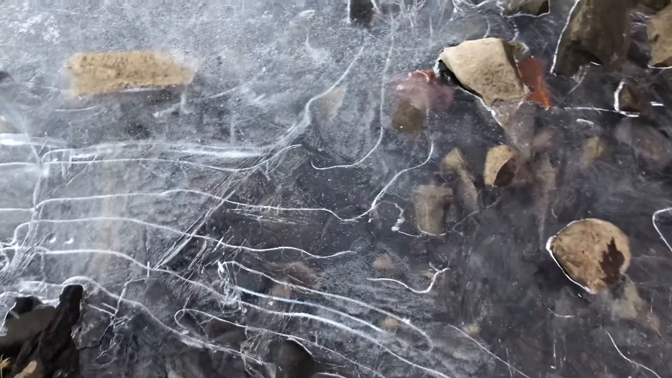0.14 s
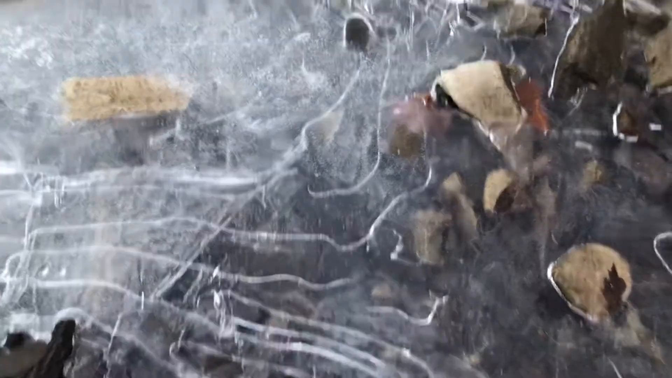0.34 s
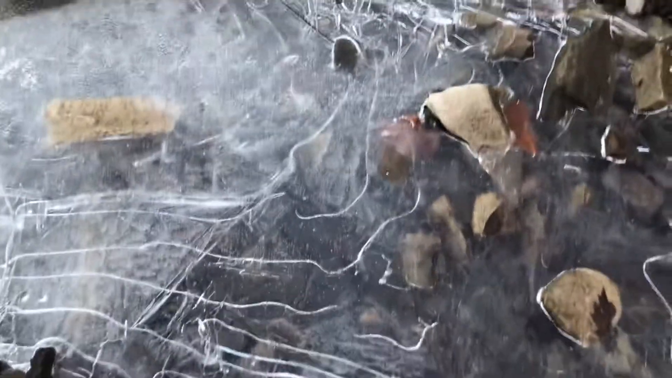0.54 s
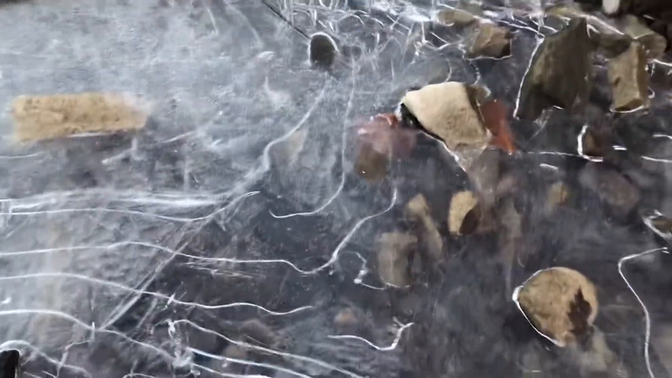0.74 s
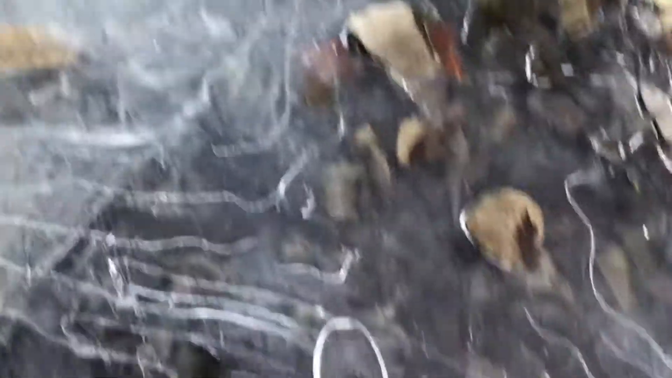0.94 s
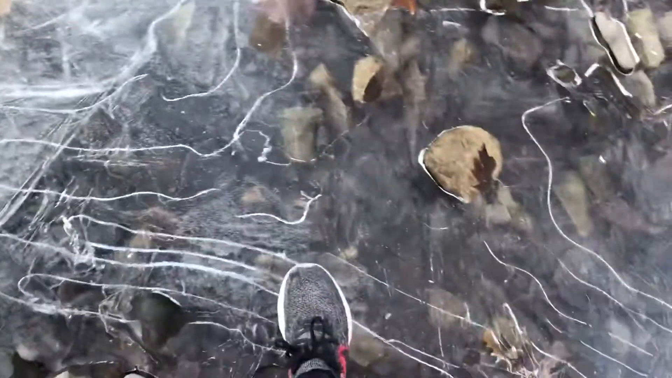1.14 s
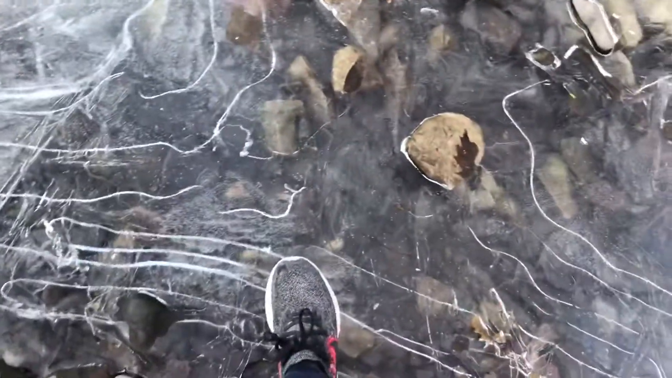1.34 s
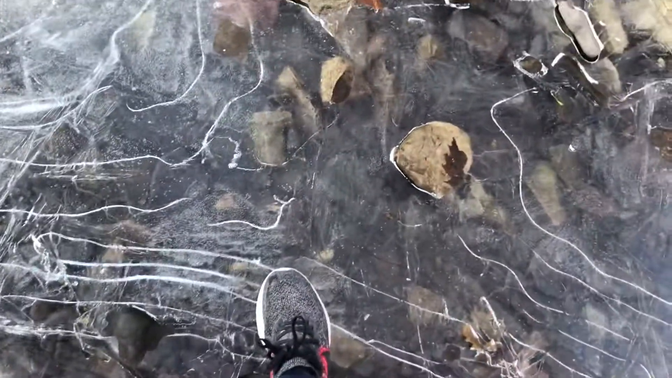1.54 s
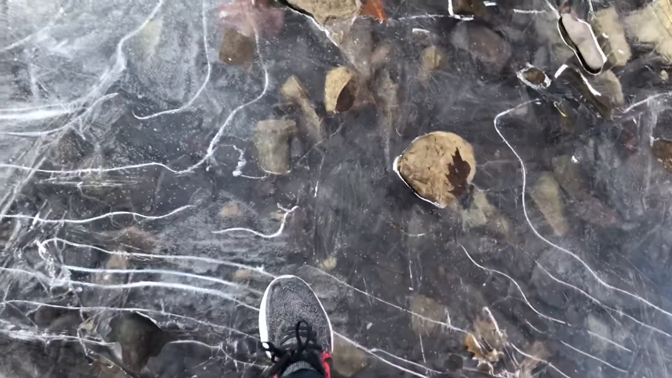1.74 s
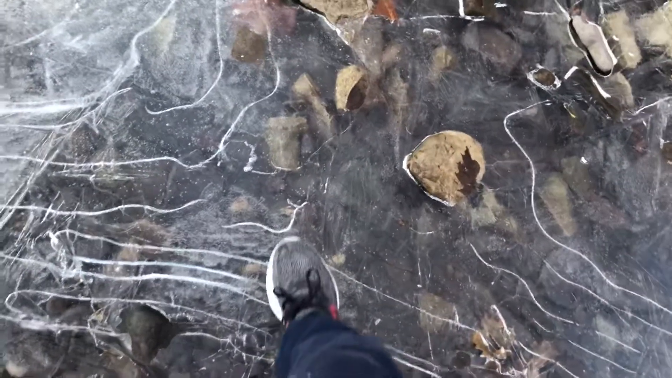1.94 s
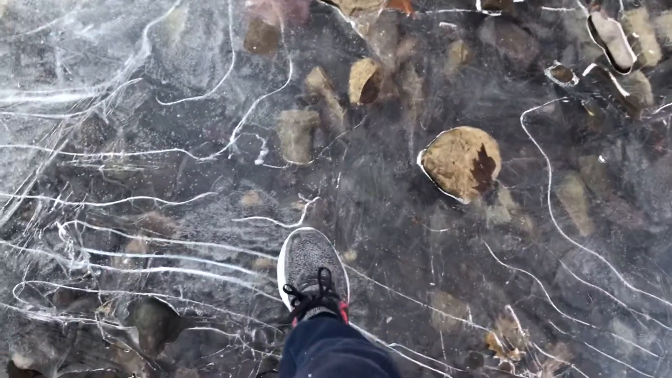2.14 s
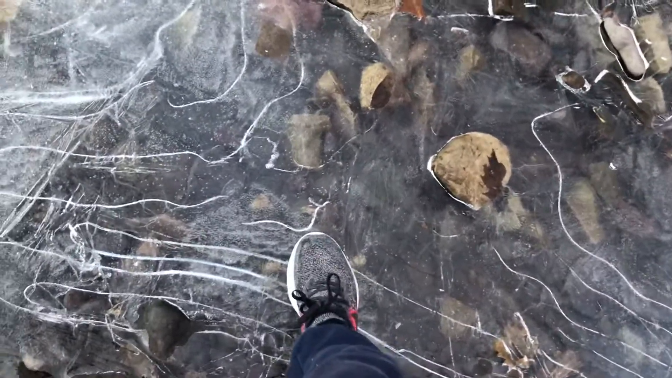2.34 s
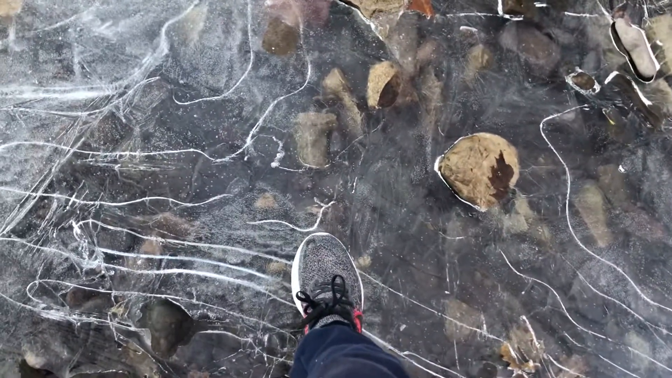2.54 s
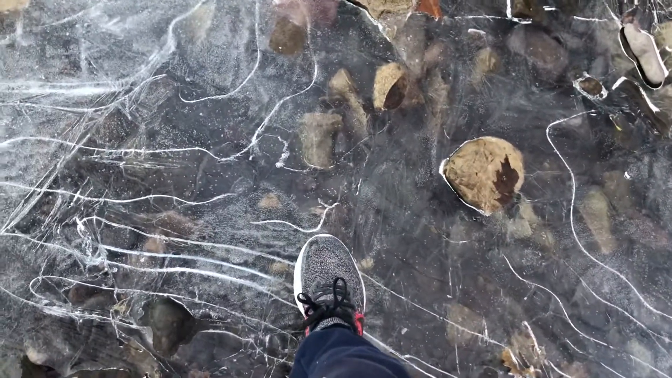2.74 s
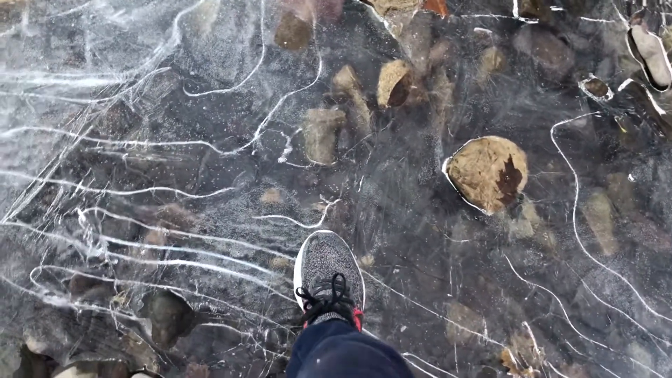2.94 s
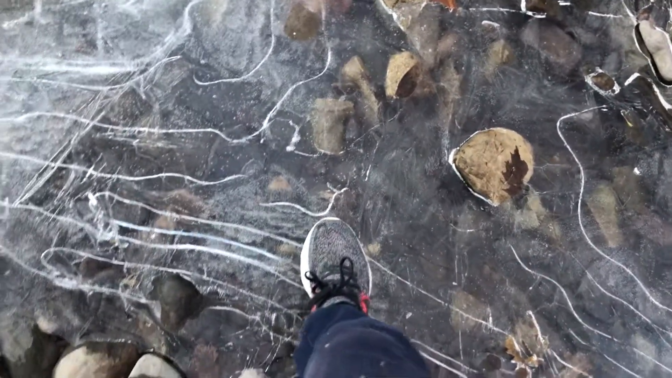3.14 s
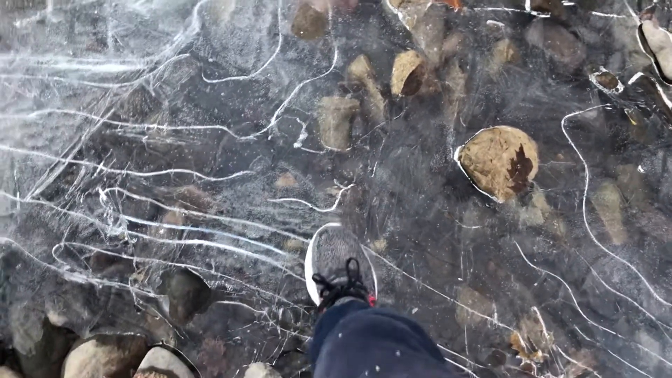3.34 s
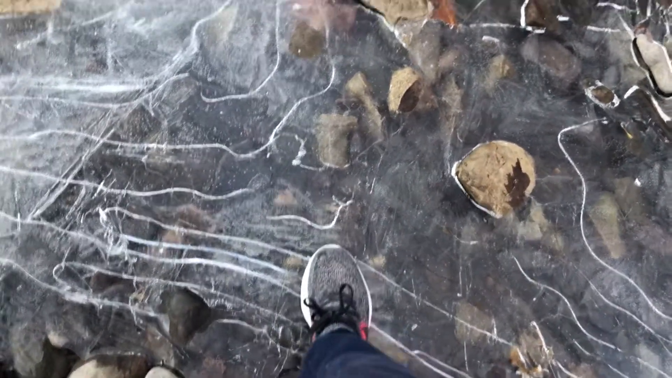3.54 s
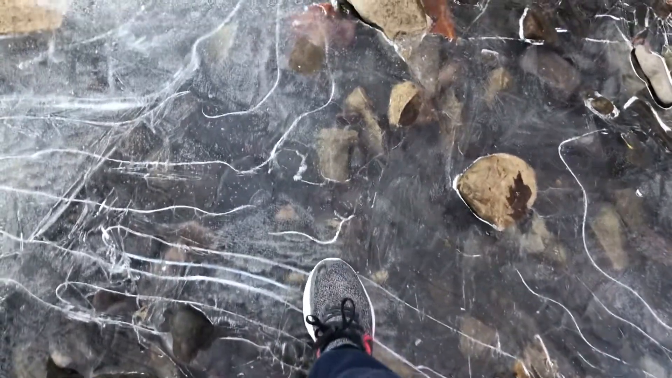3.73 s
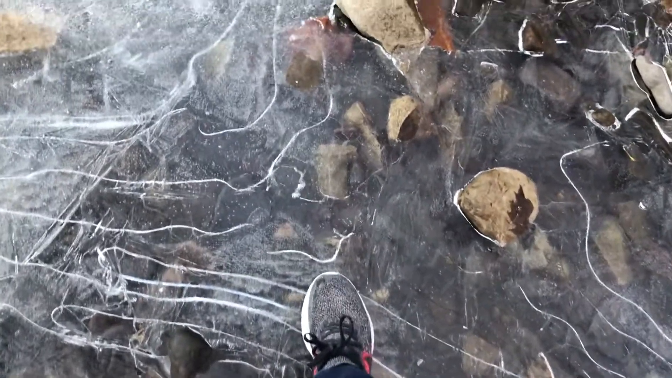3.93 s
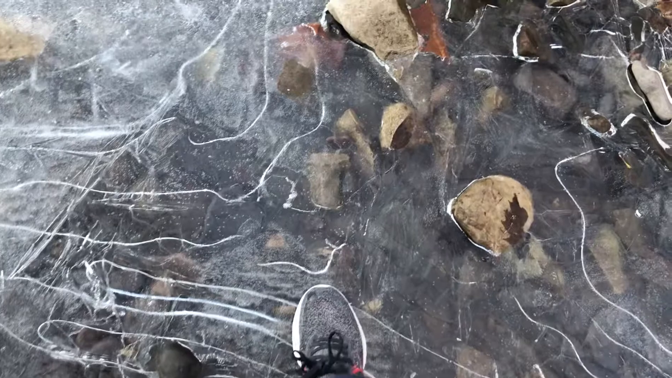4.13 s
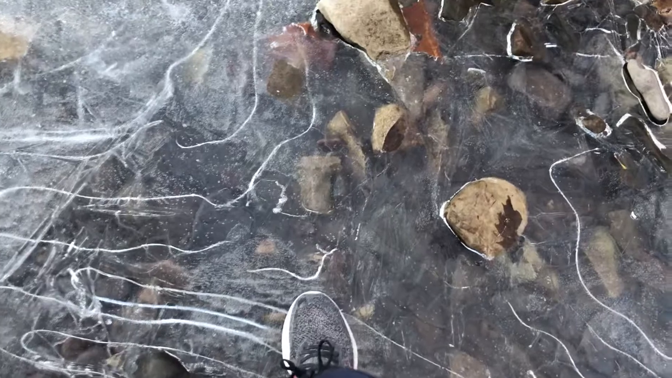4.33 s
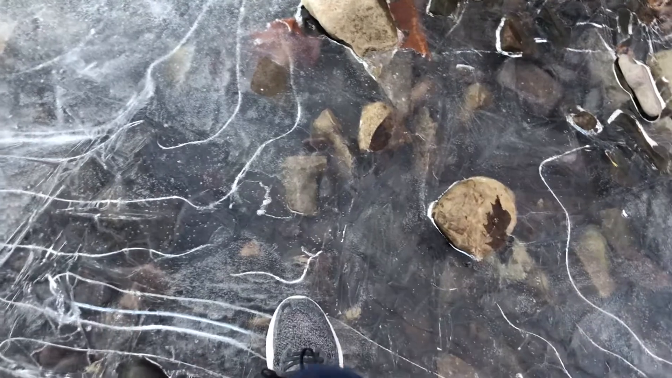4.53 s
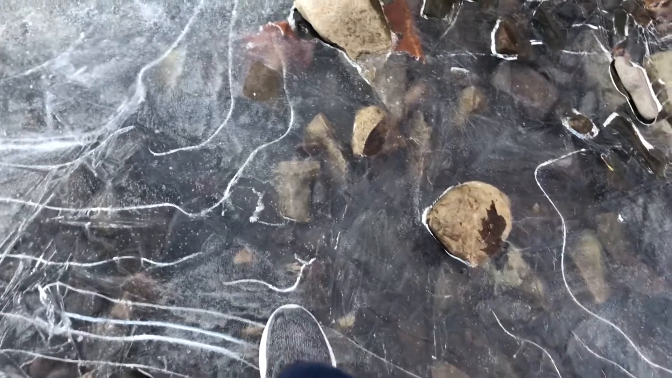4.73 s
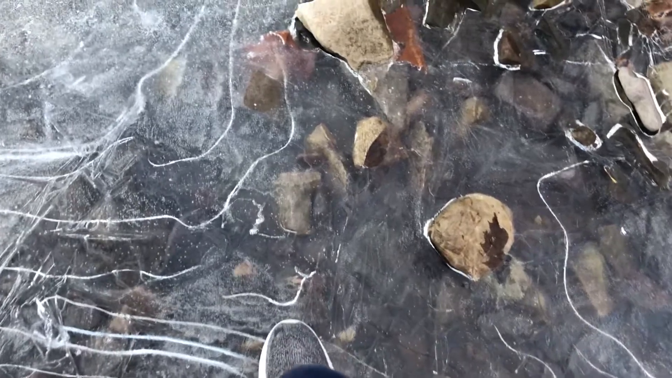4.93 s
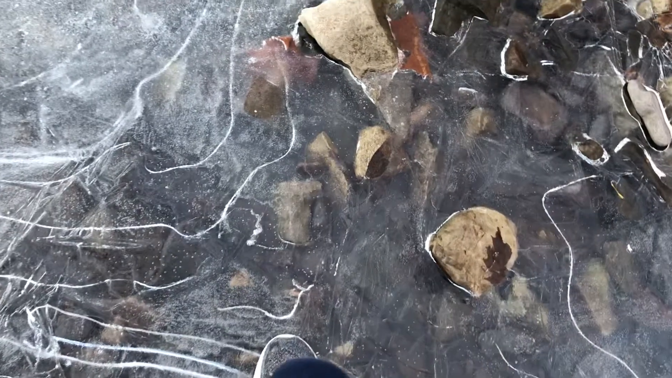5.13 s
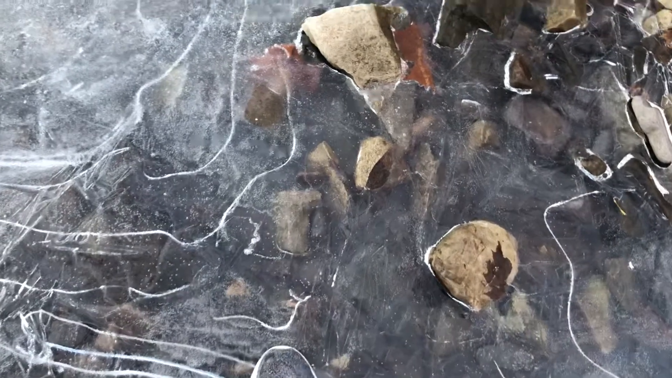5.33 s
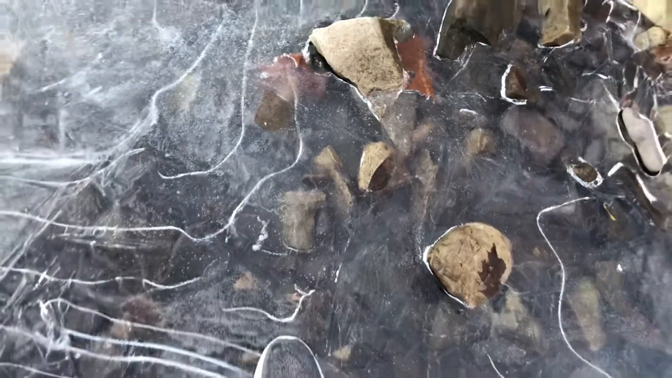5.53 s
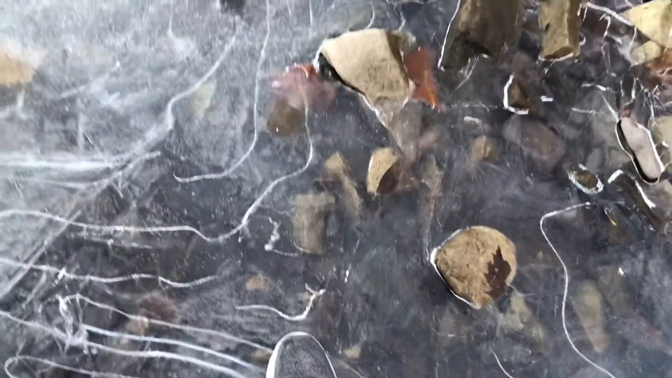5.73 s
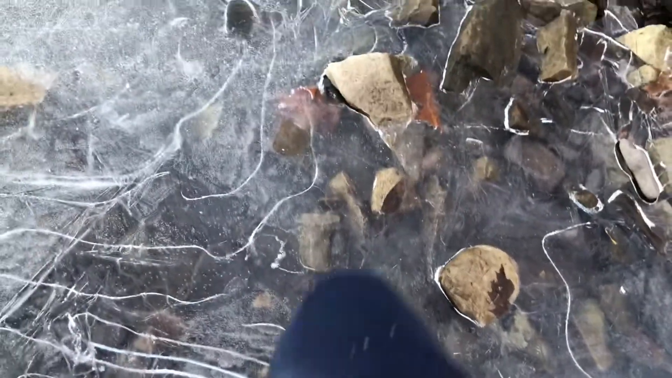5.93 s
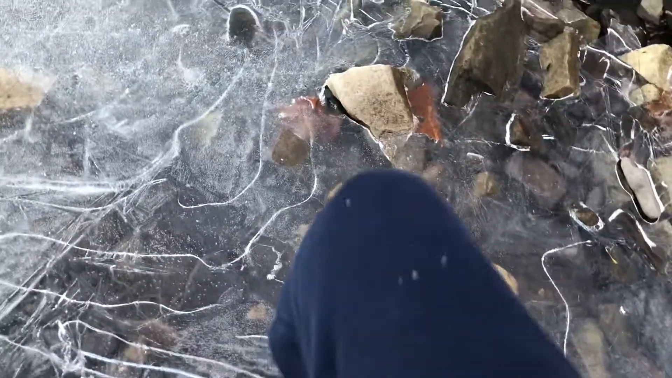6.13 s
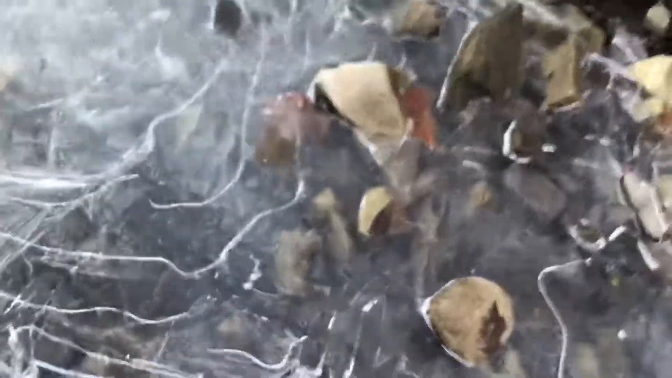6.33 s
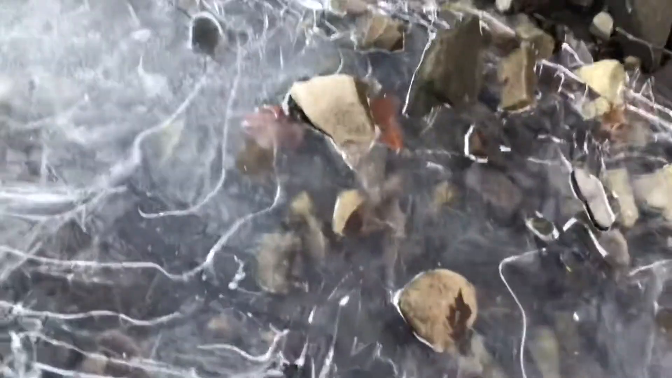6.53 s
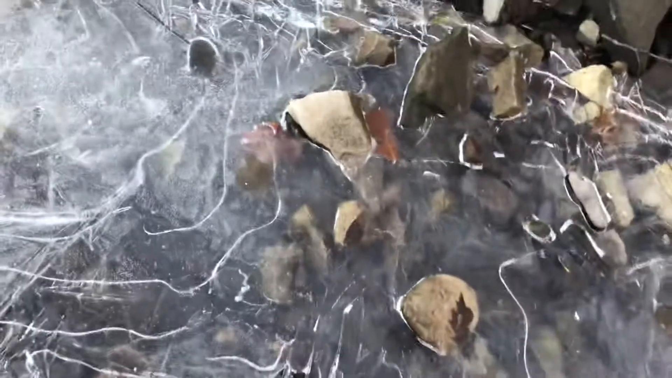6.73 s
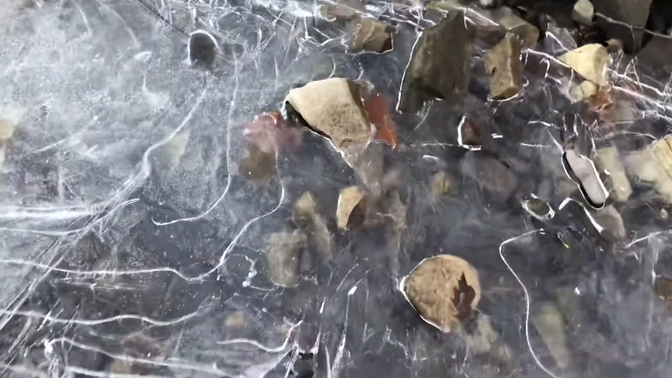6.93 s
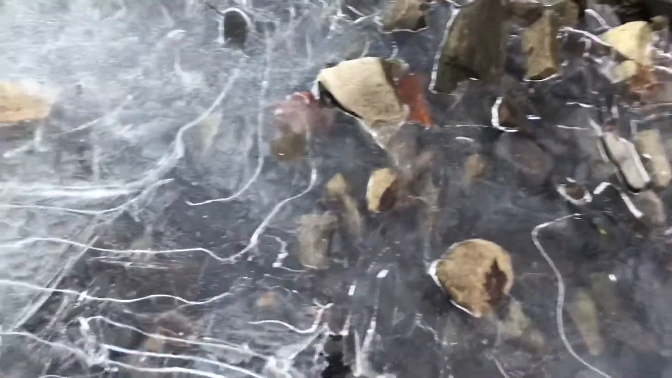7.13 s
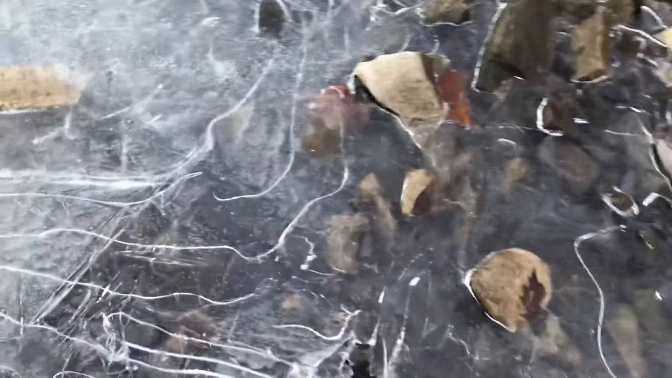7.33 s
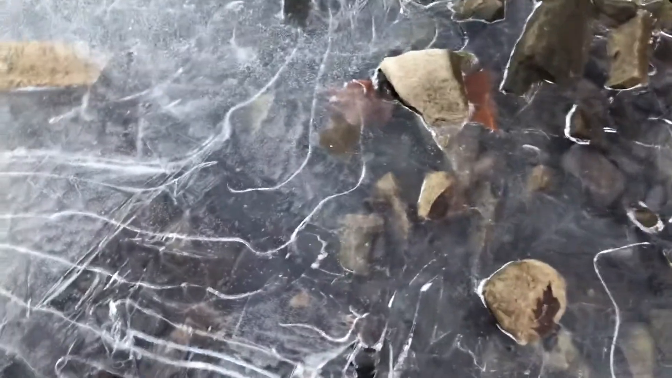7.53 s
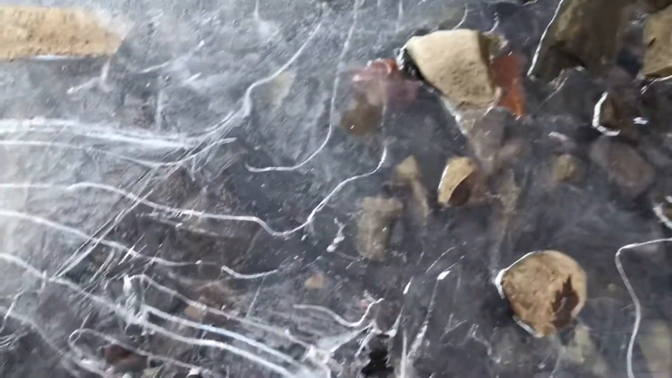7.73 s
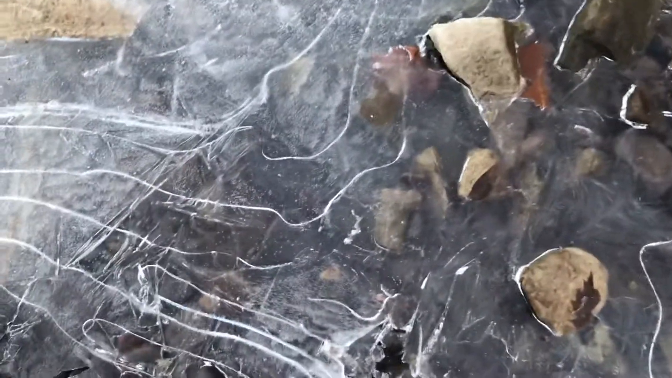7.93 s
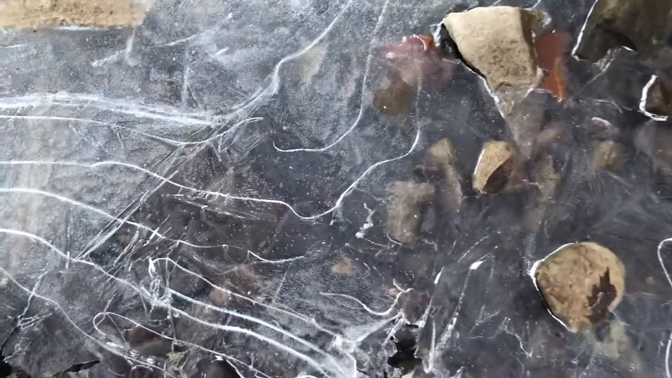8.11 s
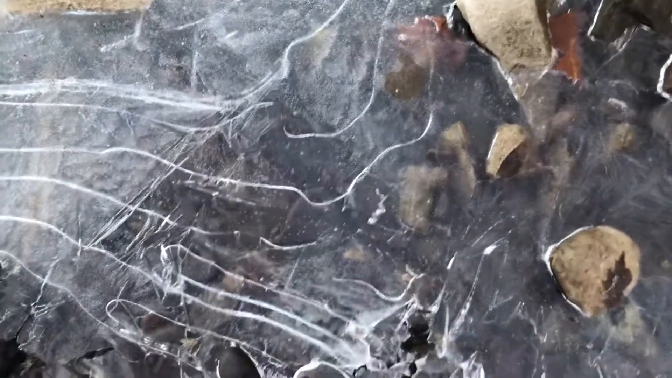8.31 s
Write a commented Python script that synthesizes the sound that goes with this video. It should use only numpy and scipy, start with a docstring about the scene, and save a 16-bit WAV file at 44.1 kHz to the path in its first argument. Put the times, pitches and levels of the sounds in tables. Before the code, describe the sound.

A faint, low creek murmur runs throughout, outdoors and close to the ice, with little echo. Tiny ticks and soft rubbing begin at once. From 0.66 to 0.95 seconds a cluster of sharp cracks and hollow plate knocks crunches, ending in short pings of trapped air. Lighter crackling and grinding follow around 1.45 to 1.75, with sparse snaps after. At 2.9 a firm crack has a slight low thud; then mostly fine ticks until another small crunch at 5.15 to 5.5. At 6.2 the sheet gives way: the loudest moment, a heavy burst of cracks, deep short thump and dense crackling shower, dying quickly into bright clinking splinters and gurgling bubbles until 6.8. A thin splash comes near 6.96. From 7.2 to 7.5 a second brittle, very bright crunch snaps and clinks over bubbling water, then small scattered cracks and ticks continue to the end at about 8.4.

```python
"""A shallow creek murmurs steadily while fine ticking and crunching start up: a shoe pressing on thin ice at its edge.
Each crack is a burst of noise sent through the sheet as a bending wave, treble first; showers of tiny breaks
make the crunch between cracks. Snapping shards, loose plates and trapped air ring as damped tones.
At 6.2 s the sheet gives way with a thump and a dense shower of breaks; then splinters clink and
bubbles gurgle in the hole. The banks scatter a weak echo of the ice."""
import sys
import numpy as np
from scipy import signal
from scipy.fft import rfft, irfft
from scipy.io import wavfile

SR = 44100
rng = np.random.default_rng(int(sys.argv[2]) if len(sys.argv) > 2 else 0)


def inscribe(sig):
    """Save sig as 16-bit PCM at rate SR to the path in sys.argv[1].

    A 1-D sig is mono; a 2-D sig holds one channel per row.
    Samples are clipped to [-1, 1] before scaling.
    """
    pcm = np.round(np.clip(np.atleast_2d(sig).T, -1, 1) * 32767)
    wavfile.write(sys.argv[1], SR, pcm.astype(np.int16))


N = 373438
TIME = np.arange(N) / SR
BREAK_S = 6.2128  # the sheet gives way


def undb(db):
    """Decibels to gain."""
    return 10 ** (np.asarray(db) / 20)


def unit(x):
    """Scale to rms 1."""
    return x / np.sqrt(np.mean(x ** 2))


def add(out, s, x):
    """Mix x into out from time s."""
    i = max(int(s * SR), 0)
    out[i:i + len(x)] += x[:max(N - i, 0)]


def outline_gain(f, points):
    """Gain at each frequency f, drawn between (Hz, dB) points on a log frequency axis."""
    hz, db = np.transpose(points)
    return undb(np.interp(np.log(f), np.log(hz), db))


def colour(x, points):
    """Filter by a (Hz, dB) outline."""
    f = np.fft.rfftfreq(len(x), 1 / SR) + 1
    return irfft(rfft(x) * outline_gain(f, points), len(x))


def walk(rate):
    """Random line through normal knots, rate knots per second."""
    knots = rng.standard_normal(2000)
    return np.interp(TIME * rate, np.arange(len(knots)), knots)


def grains(rate, spread, fade_s):
    """Countless tiny bursts of noise, rate per second, of very unequal size; rms 1."""
    chance, size, sign = rng.random(N), rng.exponential(size=N), rng.standard_normal(N)
    energy = (chance < rate / SR) * undb(spread * np.minimum(size, 4)) ** 2
    power = signal.lfilter([1], [1, -np.exp(-2 / (fade_s * SR))], energy)
    return unit(sign * np.sqrt(power + 1e-18))


def ring(hz, db, t60, rise_s, glide):
    """One damped mode with a soft onset; its pitch drifts up by the fraction glide over t60."""
    t = np.arange(int(t60 * SR) + 1) / SR
    envelope = (1 - np.exp(-t / rise_s)) * np.exp(-np.log(1000) * t / t60)
    cycles = hz * t * (1 + glide * t / t60 / 2)
    return undb(db) * envelope * np.sin(2 * np.pi * cycles)


def swarm(table, octaves, range_db, t60, glide):
    """Many short rings scattered evenly in time, pitch and level around each row's values."""
    out = np.zeros(N)
    for start, end, count, hz, db in table:
        for when, pitch, size in rng.random((80, 3))[:int(count)]:
            s = start + when * (end - start)
            one_hz = hz * 2 ** (octaves * (pitch - .5))
            one_db = db + range_db * (size - .5)
            add(out, s, ring(one_hz, one_db, t60, rise_s=0.000071, glide=glide))
    return out


# Colour of the creek's murmur. Each row: frequency in Hz, relative level in dB.
CREEK_COLOUR = [(20, -49.5), (45, 3), (65, 5), (110, 1), (220, -6), (360, -3.5), (500, -10), (1150, -7),
                (2000, -17.5), (3000, -23.5), (4500, -26.5), (8000, -35.5), (16000, -37)]
CREEK_DB = -56  # rms of the murmur


def creek():
    """Steady noise of running water, wavering a little in level, with a faint low drone."""
    murmur = 0
    for rate in (3, 14):
        waver = undb(0.48 * walk(rate))
        murmur = murmur + colour(rng.standard_normal(N), CREEK_COLOUR) * waver
    drone_colour = [(250, -46.5), (335, -25.0), (360, 8.5), (390, -36.5), (480, -46), (2000, -95)]
    drone = colour(rng.standard_normal(N), drone_colour)
    return undb(CREEK_DB) * unit(murmur) + undb(-70.0) * unit(drone)


# The shoe loading the ice. Each row: peak in seconds, swell and fade time constants in seconds,
# dull grinding level in dB, fine crackle level in dB (both before the trims below).
PUSHES = [(.05, 0.18, 0.12, -50, -61), (0.198, 0.032, 0.02, -37.5, -42), (.68, 0.018, .05, -39, -44),
          (.79, 0.029, 0.052, -28, -39), (.96, .015, 0.065, -54, -52), (1.52, 0.035, 0.23, -39.5, -64),
          (1.66, 0.13, 0.16, -45, -46.5), (1.931, 0.03, 0.013, -44, -50), (2.13, 0.026, 0.012, -42, -58),
          (2.94, 0.061, 0.11, -37, -53), (3.25, 0.18, 0.068, -56, -56.5), (4.25, 0.16, 0.27, -64, -67.5),
          (5.191, 0.04, 0.089, -41, -49.5), (5.31, 0.04, 0.062, -44, -48), (5.48, 0.074, 0.067, -46, -54.5),
          (5.789, 0.045, 0.023, -40.5, -46.5), (6.345, .02, 0.023, -39, -54),
          (6.42, 0.029, 0.085, -41.5, -38.5), (6.69, 0.041, 0.06, -45, -51), (6.98, 0.36, 0.15, -58.5, -62),
          (7.27, 0.036, 0.07, -31.5, -35), (7.49, 0.059, 0.047, -51.5, -46.5),
          (7.85, 0.056, 0.18, -48.5, -48), (8., 0.043, 0.028, -46, -51), (8.17, 0.084, .12, -48, -47)]
GRIND_TRIM_DB, CRACKLE_TRIM_DB, TICKING_DB = 0.5, 2.2, -74.5
# Dull low colour of grinding ice. Each row: frequency in Hz, relative level in dB.
GRIND_COLOUR = [(70, -31), (150, -4.5), (300, -8.5), (500, -1.5), (700, -3.5), (1000, -4.5), (1700, -7.5),
                (2800, -15), (6000, -21)]
# Bright colour of fine crackle. Each row: frequency in Hz, relative level in dB.
CRACKLE_COLOUR = [(700, -26), (1800, -9.5), (3800, -0.5), (6000, 0), (8000, -7.5), (11000, -5.5),
                  (16000, -13)]


def crunch():
    """Ice crushed under the sole: each load swells and dies away, dull grinding below, fine crackle above."""
    grind_power, crackle_power = np.zeros(N), np.zeros(N)
    for s, swell_s, fade_s, grind_db, crackle_db in PUSHES:
        distance = np.maximum((s - TIME) / swell_s, (TIME - s) / fade_s)
        load = np.exp(-np.minimum(distance, 20))
        grind_power += (load * undb(grind_db)) ** 2
        crackle_power += (load * undb(crackle_db)) ** 2
    grind = unit(colour(grains(rate=380, spread=4.5, fade_s=.003), GRIND_COLOUR))
    crackle = unit(colour(grains(rate=800, spread=4.7, fade_s=.0008), CRACKLE_COLOUR))
    # the finest ticking of the sheet never quite stops
    ticking = unit(colour(grains(rate=90, spread=4.8, fade_s=.0009), CRACKLE_COLOUR))
    grinding = undb(GRIND_TRIM_DB) * np.sqrt(grind_power) * grind
    crackling = undb(CRACKLE_TRIM_DB) * np.sqrt(crackle_power) * crackle
    return grinding + crackling + undb(TICKING_DB) * ticking


def banks(x, db=-21, t60=0.2):
    """Weak scatter from the stones and banks: a decaying noise echo, duller than the ice, after 7 ms."""
    t = np.arange(SR // 2) / SR
    echo = rng.standard_normal(len(t)) * np.exp(-np.log(1000) * t / t60) * (t > .007)
    echo = colour(echo, [(100, 7.0), (600, 6.5), (3000, 1.5), (15000, -36.5)])
    return undb(db) * signal.fftconvolve(x, echo / np.sqrt(np.sum(echo ** 2)))[:N]


# The four bands of a break: body, knock, snap, fizz. Each entry: centre in Hz.
BAND_HZ = [450, 1500, 4200, 10500]
# Colour of the sheet, shared by all breaks. Each row: frequency in Hz, relative level in dB.
SHEET_COLOUR = [(60, -44), (150, -11.5), (300, -4), (460, -2.5), (620, 2), (820, -3), (1200, 1.5),
                (1750, 3.5), (2500, -2), (4000, 2.5), (9000, -4), (16000, -7)]


def fracture(t, band_db, fade_s, tail_db, tail_s, front, bend, low_hz, damping, rise_s, mirror):
    """A sharp front and a burst of micro-breaks; lows ring longer and, as bending waves, arrive later."""
    f = np.fft.rfftfreq(len(t), 1 / SR) + 1
    age = np.maximum(t - 64 / SR, 0)  # a short lead before the break
    noise = rng.standard_normal(len(t)) * (1 - np.exp(-age / rise_s))
    path, edge = rng.uniform(.7, 1.3, 2)  # relative lengths of the wave's path and of the way to the edge
    sheet = outline_gain(f, SHEET_COLOUR) / (1 + (low_hz / f) ** 4)
    # bending waves travel at a speed that grows with the root of frequency
    sheet = sheet * np.exp(-4j * np.pi * bend * path * np.sqrt(f))
    # a reflection from the nearest free edge gives each break its own colour
    sheet *= 1 + mirror * np.exp(-4j * np.pi * 0.0395 * edge * np.sqrt(f))
    out = 0
    for k, (hz, db) in enumerate(zip(BAND_HZ, band_db)):
        slow = (BAND_HZ[1] / hz) ** damping  # above 1 in the body band, below 1 in the treble
        tail = undb(tail_db) * np.sqrt(slow) * np.exp(-age / tail_s)
        burst = noise * (np.exp(-age / (fade_s * slow)) + tail)
        burst[np.argmax(age > rise_s)] += front * np.sqrt(slow)
        share = np.interp(np.log(f), np.log(BAND_HZ), np.arange(len(BAND_HZ)) == k)
        wave = irfft(rfft(burst) * share * sheet)
        # the band level is its rms if its energy filled 10 ms
        out = out + wave * undb(db) / np.sqrt(np.sum(wave ** 2) / (SR / 100))
    return out


def tick(band_db):
    """A small break that hardly bends the sheet, so it reaches less low."""
    t = np.arange(4096) / SR
    return fracture(t, band_db, fade_s=.0021, tail_db=-17, tail_s=.011, front=4.5, bend=.06,
                    low_hz=385, damping=.55, rise_s=.0005, mirror=.45)


# Light ticks of the sheet under a resting foot. Each row: time in seconds, level in dB before the band shares.
TICKS = [(.032, -59), (0.09, -49.5), (0.17, -46), (.399, -55), (0.8945, -47), (1.088, -52), (1.409, -54.5),
         (1.448, -45.5), (2.6621, -45), (2.7555, -49), (2.821, -45.5), (3.9216, -46.5), (4.0742, -49),
         (4.113, -47), (4.1893, -48.5), (4.2798, -48), (4.3865, -49.5), (4.4467, -55), (4.5417, -49),
         (5.1447, -47), (5.731, -46)]
# Share of a tick in the four bands. Each entry: dB.
TICK_SHARE_DB = [-2, 0, -6, -3.5]
# Hairline cracks, before their random scatter. Each entry: level in one of the four bands in dB.
HAIRLINE_DB = [-69, -65, -67, -62.5]
HAIRLINE_PER_S, HAIRLINE_SCATTER_DB = 5, 3  # scatter is up or down


def ticks():
    """Small breaks under the resting foot, and hairline cracks that come by chance at any time."""
    out = np.zeros(N)
    for s, db in TICKS:
        add(out, s - .002, tick(db + np.array(TICK_SHARE_DB)))
    for when, size in rng.random((int(HAIRLINE_PER_S * N / SR), 2)):
        band_db = np.array(HAIRLINE_DB) + HAIRLINE_SCATTER_DB * (2 * size - 1)
        add(out, when * N / SR, tick(band_db))
    return out


# Shards snapping off. Each row: time in seconds, pitch in Hz, snap level in dB before the skirt,
# ring level in dB before its soft onset, ring t60 in seconds.
SHARDS = [(0.127, 1680, -40.5, -28, .012), (0.5197, 920, -40.5, -23.5, 0.011),
          (1.6347, 6510, -37, -24.5, .043), (1.635, 3140, -55, -32, .065), (1.857, 7100, -42, -50, .02),
          (3.112, 11000, -43, -53, 0.009), (2.325, 7950, -61, -61, .02), (3.306, 8000, -59, -58, .02),
          (3.361, 8100, -53.5, -60, .02), (3.709, 8100, -61, -66, .02), (4.7737, 10100, -52.5, -55, .02),
          (4.913, 9050, -52, -64, .02), (4.969, 8900, -52.5, -51, .02), (6.3451, 1650, -42, -24, 0.034),
          (6.389, 14800, -34, -30, .03), (6.4211, 10840, -32, -24, .042), (6.4561, 4270, -33.5, -21, 0.024),
          (6.494, 5440, -40, -45, .02), (6.5344, 6550, -42, -48, .02), (6.577, 6220, -55, -35.5, .032),
          (6.6188, 4000, -43.5, -45, .02), (6.6376, 4540, -37.5, -49, .02),
          (6.718, 8630, -30.5, -25.5, 0.034), (6.7445, 4050, -41, -25.5, 0.046),
          (6.8142, 10000, -46.5, -48, .02), (6.907, 11000, -54, -49, .02), (7.0233, 9100, -53, -42, .02),
          (7.201, 1520, -33, -20, 0.037), (7.227, 3000, -24.5, -38, .02), (7.261, 5000, -27, -15, 0.014),
          (7.274, 3840, -26, -2, 0.0096), (7.3615, 13000, -22.5, -35, .02), (7.3733, 13000, -34, -38, .02),
          (7.4275, 6800, -33, -46, .02), (7.476, 5600, -46, -33, .038), (7.5336, 2060, -39, -34, 0.025),
          (7.6025, 6530, -47.5, -50, .02), (7.6278, 4830, -50, -38, .022), (7.835, 12100, -41.5, -50, .02),
          (8.119, 12000, -46, -50, .02), (8.402, 5500, -46, -56, .02)]
SHARD_SKIRT_DB_PER_OCTAVE = 7.5


def shards():
    """Pieces snapping off: each snap is loudest around the shard's own pitch, and the shard rings there."""
    out, t = np.zeros(N), np.arange(2048) / SR
    for s, hz, snap_db, ring_db, t60 in SHARDS:
        octaves_away = np.abs(np.log2(np.array(BAND_HZ) / hz))
        band_db = snap_db - SHARD_SKIRT_DB_PER_OCTAVE * octaves_away
        snap = fracture(t, band_db, fade_s=0.0027, tail_db=-12, tail_s=0.014, front=4.6, bend=0.0496,
                        low_hz=520, damping=0.35, rise_s=0.00055, mirror=0.42)
        add(out, s - .002, snap)
        add(out, s, ring(hz, ring_db, t60, rise_s=0.00058, glide=.005))
    return out


# Cracks in the sheet. Each row: time in seconds, level in dB, treble over bass in dB,
# middle over both ends in dB (all before the shared colour).
CRACKS = [(.1991, -40.5, -1, -9.5), (.6643, -28.5, 3, 3.5), (.6785, -36.5, -11, 2),
          (.6921, -35.5, -15.5, -4), (0.715, -36, -8, 5), (.746, -31, -12.5, -5.5), (.7507, -36, 8, 8),
          (.7728, -35, -15, 0.5), (.7944, -38.5, -12, 10), (.8182, -43, -15, 0), (.9187, -33, -1, 8.5),
          (.9317, -34.5, 5, 2), (.936, -32.5, 4, -1), (1.4697, -41.5, -4.5, -5.5), (1.491, -41.5, 2, 4.5),
          (1.517, -38.5, 1, -5), (1.5259, -39, -9, -11), (1.5438, -33.5, 4.5, -5), (1.578, -42.5, 6, 1),
          (1.5935, -44.5, 20, 3), (1.6058, -40.5, 2, -7.5), (1.6792, -48.5, -10, -10), (1.6937, -37, 3, 0),
          (1.7314, -49.5, 14, -1), (1.7517, -51, 12, -4), (1.9339, -49.5, -2, -4), (2.1336, -48, -15, -1.5),
          (2.886, -30.5, -1, -1.5), (2.9255, -33, 7, -2.5), (2.9407, -33.5, 12, 1), (2.9617, -35.5, 5, -6),
          (3.0262, -48.5, 13, -5), (3.0514, -47.5, 15, 2), (3.0736, -49.5, 13, -5), (5.1447, -44, 4, -5),
          (5.176, -49, -5, -4), (5.188, -36.5, 1.5, -0.5), (5.2764, -47, -7, 11), (5.2901, -38, 3, -2.5),
          (5.3, -38.5, 4, -4), (5.3417, -52, 8, -11), (5.3617, -50, 8, -5), (5.4335, -49.5, 9, 0),
          (5.7994, -50.5, 14, -3), (6.2116, -22.5, -7, 1.5), (6.2257, -19.5, -5, -6), (6.2354, -22, -5, -1),
          (6.243, -28, -15, 17.5), (6.259, -28, -17, 9), (6.271, -28, -12, 8), (6.3242, -35.5, 6, 2),
          (6.4235, -49, 8, -10), (6.6777, -37, 7, -2), (7.2429, -37.5, -1, -11), (7.3029, -30.5, 8, -5),
          (7.3182, -33.5, 0, -7), (7.3449, -36, 10, -5), (7.349, -31, 1, -4), (7.353, -29, 14, -11),
          (7.7935, -51, 13, -4.5), (7.9741, -49, 11, -6), (7.9935, -42, 5, -3), (8.1723, -44.5, 3.5, -12)]
# Colour added to every crack. Each entry: gain in one of the four bands in dB.
CRACK_COLOUR_DB = [0.1, -1.1, 0.7, -.3]
# how treble-over-bass and middle-over-ends spread over the four bands
TILT, HUMP = np.linspace(-.5, .5, 4), np.array([-.5, .5, .5, -.5])
LOOSE_PLATE_HZ = 394  # from half a second after the break, cracks reach no lower


def cracks(low_hz=230, size_db=60):
    """Single cracks running through the sheet; bigger ones bend more ice and reach lower, loose plates less low."""
    out, t = np.zeros(N), np.arange(4096) / SR
    for s, db, tilt_db, hump_db in CRACKS:
        band_db = db + tilt_db * TILT + hump_db * HUMP + np.array(CRACK_COLOUR_DB)
        reach_hz = min(low_hz * np.exp(-2 * (band_db[0] + 45.5) / size_db), 420)
        if s > BREAK_S + .5:
            reach_hz = max(reach_hz, LOOSE_PLATE_HZ)
        crack = fracture(t, band_db, fade_s=.0021, tail_db=-15, tail_s=.012, front=4., bend=.07,
                         low_hz=reach_hz, damping=.55, rise_s=.0006, mirror=.45)
        add(out, s - .002, crack)
    return out


# Soft swishes: rubbing of shoe and trouser leg, a thin bright splash near 6.96 s, and the bright upper part of
# a bubble's chirp at 7.16 s. Each row: middle in seconds, half length in seconds, pitch in Hz, level in dB.
SWISHES = [(0.378, 0.21, 4320, -65.5), (0.665, 0.01, 605, -31.5), (0.675, 0.019, 4500, -55),
           (4.638, 0.048, 5000, -59), (4.706, 0.9, 5000, -92), (6.16, 0.12, 6360, -62),
           (6.683, 0.023, 646, -40), (6.964, 0.016, 11900, -54.5), (7.157, 0.0086, 4180, -51)]


def swishes():
    """Soft rubbing, a thin splash and a bubble's bright chirp: dense grains coloured around one pitch, swelling
    and fading."""
    out = np.zeros(N)
    for s, half_s, hz, db in SWISHES:
        swish_colour = [(hz / 4, -20), (hz / 2.0, -8), (hz, 0), (hz * 1.3, -7), (hz * 3, -11)]
        swish = colour(grains(rate=1500, spread=3.7, fade_s=0.0017), swish_colour)
        out += undb(db) * unit(swish) * np.exp(-((TIME - s) / half_s) ** 2)
    return out


# Levels in the knock, pocket and thump tables are before each ring's soft onset.
# Smaller plates knocking as they come loose. Each row: start in seconds, pitch in Hz, level in dB.
KNOCKS = [(.693, 604, -28), (.749, 517, -11), (.773, 599, -8), (2.89, 318, -26), (2.944, 468, -16),
          (2.962, 266, -27.5), (3.128, 810, -40), (3.181, 940, -31), (5.302, 452, -27), (7.351, 665, -13.5)]
KNOCK_CYCLES = 24.4  # starting pitch times t60
# Air pockets under the ice. Each row: start in seconds, pitch in Hz, level in dB, t60 in seconds.
POCKETS = [(0.9205, 1275, -14, 0.067), (0.923, 2800, -19.5, 0.026), (.933, 2222, -18.5, .11),
           (1.131, 2220, -46.5, 0.037), (1.178, 2210, -53, 0.039)]
# The sheet sagging under the foot. Each row: start in seconds, level in dB before the mode levels.
THUMPS = [(1.519, -40), (2.94, -22), (5.194, -20.5), (6.2148, -1.5)]
# Modes of the whole sheet. Each row: frequency in Hz, relative level in dB, t60 in seconds.
SHEET_MODES = [(135, -9, 0.093), (166.2, 1.5, 0.081), (255, -8.5, 0.11)]


def resonances():
    """Knocks of loose plates, pings of trapped air and thumps of the whole sheet, all as damped modes."""
    out = np.zeros(N)
    for s, hz, db in KNOCKS:
        add(out, s, ring(hz, db, KNOCK_CYCLES / hz, rise_s=0.0061, glide=0.22))
    for s, hz, db, t60 in POCKETS:
        add(out, s, ring(hz, db, t60, rise_s=0.00076, glide=0.0037))
    for s, db in THUMPS:
        for hz, mode_db, t60 in SHEET_MODES:
            add(out, s, ring(hz, db + mode_db, t60, rise_s=0.0073, glide=0.042))
    return out


def collapse(start=BREAK_S, grind_db=-17, grind_s=0.062, crackle_db=-20, crackle_s=0.052):
    """The sheet gives way: a dense shower of grinding and crackling breaks that dies out."""
    age = np.maximum(TIME - start, 0)
    grind = unit(colour(grains(rate=310, spread=4.1, fade_s=0.0029), GRIND_COLOUR))
    grind = grind * np.exp(-age / grind_s)
    crackle = unit(colour(grains(rate=6600, spread=2.1, fade_s=0.00091), CRACKLE_COLOUR))
    crackle = crackle * np.exp(-age / crackle_s)
    return (TIME >= start) * (undb(grind_db) * grind + undb(crackle_db) * crackle)


# Splinters tumbling together. Each row: start and end in seconds, clink count,
# middle pitch in Hz, middle level in dB.
SPLINTERS = [(6.25, 6.34, 36, 5050, -36), (6.34, 6.55, 56, 5300, -47), (7.23, 7.38, 40, 6400, -33),
             (7.39, 7.56, 46, 5650, -48)]


def splinters():
    """Bits of ice clinking: short rings of steady pitch, each with its own."""
    return swarm(SPLINTERS, octaves=1.6, range_db=19, t60=0.02, glide=0)


# Water stirred in the hole. Each row: start and end in seconds, bubble count,
# middle pitch in Hz, middle level in dB.
GURGLES = [(6.29, 6.48, 50, 1550, -39), (6.48, 6.801, 40, 1230, -48), (6.97, 7.01, 6, 1360, -45),
           (7.15, 7.17, 3, 1410, -34), (7.22, 7.45, 44, 1320, -35.5), (7.45, 7.647, 30, 1300, -39.5),
           (7.52, 7.60, 18, 1530, -38)]


def water():
    """Small, quickly damped bubbles, rising slightly in pitch, where water wells up through the hole."""
    return swarm(GURGLES, octaves=0.68, range_db=7, t60=0.02, glide=0.019)


def scene():
    """Breaking ice and swishes scattered by the banks, dry thumps, knocks, pings and bubbles, and the creek."""
    ice = cracks() + ticks() + shards() + crunch() + collapse() + splinters() + swishes()
    return (ice + banks(ice) + resonances() + water() + creek())[None]


def record(dry, low_cut_hz=32, top_hz=15900):
    """Rounds the loudest peaks, then cuts the deepest bass and the extreme top."""
    rounded = .9 * np.tanh(dry / .9)
    bass_cut = signal.butter(2, low_cut_hz, "high", fs=SR, output="sos")
    top_cut = signal.ellip(10, .2, 70, top_hz, fs=SR, output="sos")
    return signal.sosfilt(top_cut, signal.sosfilt(bass_cut, rounded))


dry = scene()
out = record(dry)
inscribe(out)
```